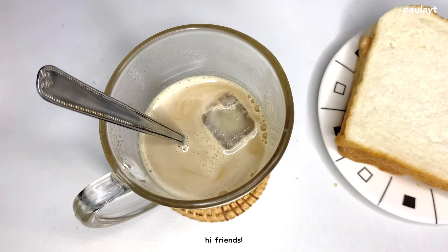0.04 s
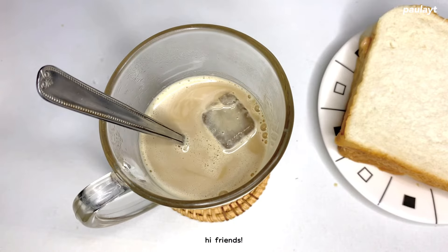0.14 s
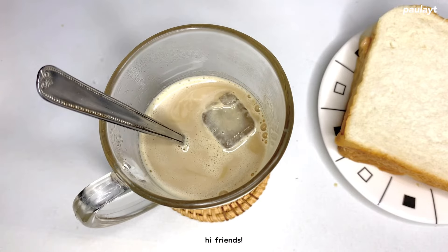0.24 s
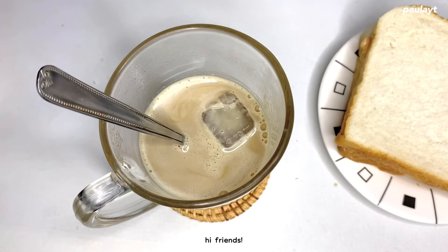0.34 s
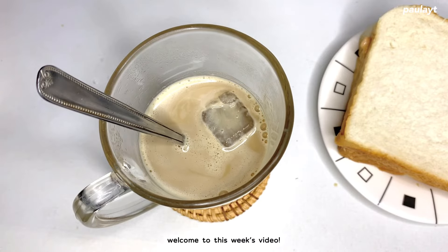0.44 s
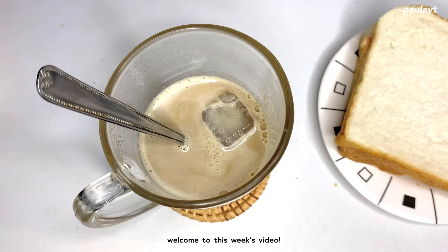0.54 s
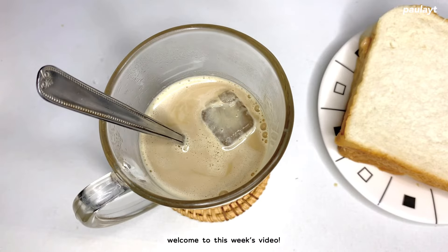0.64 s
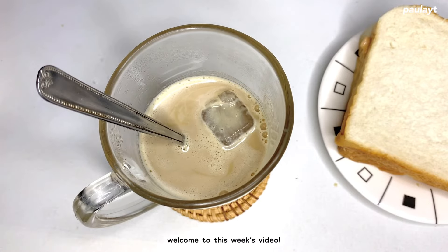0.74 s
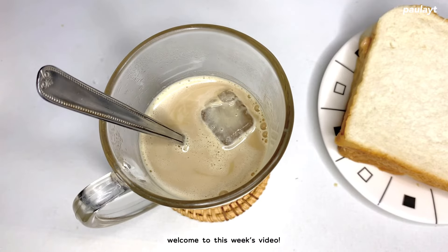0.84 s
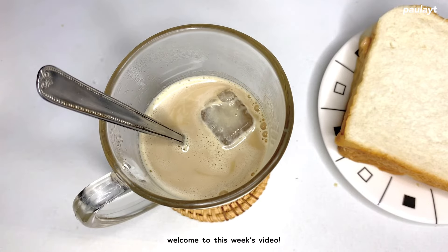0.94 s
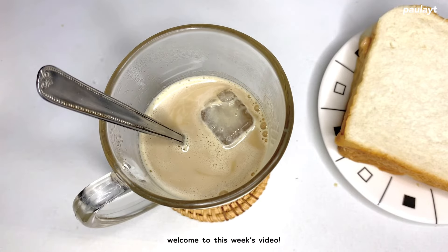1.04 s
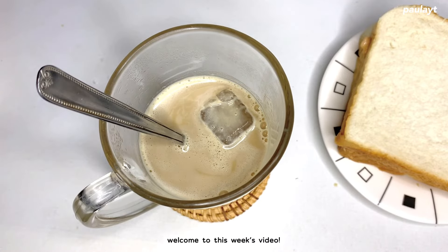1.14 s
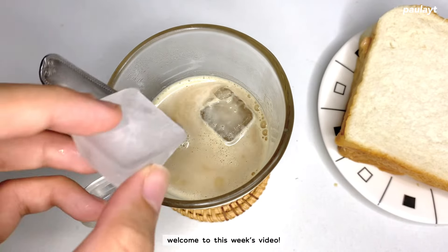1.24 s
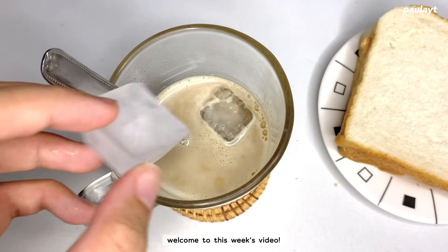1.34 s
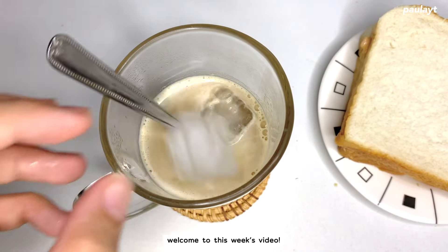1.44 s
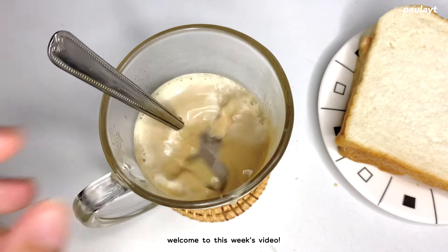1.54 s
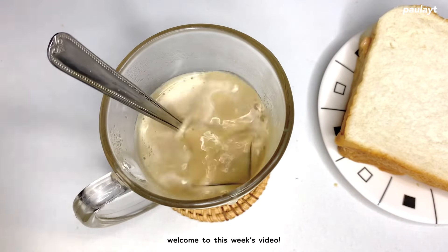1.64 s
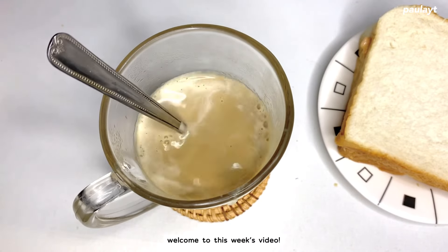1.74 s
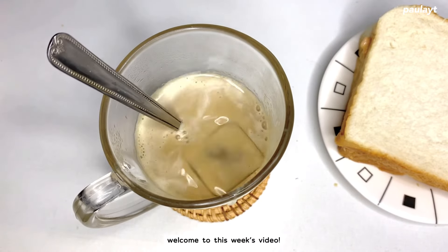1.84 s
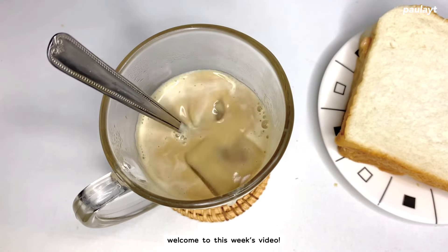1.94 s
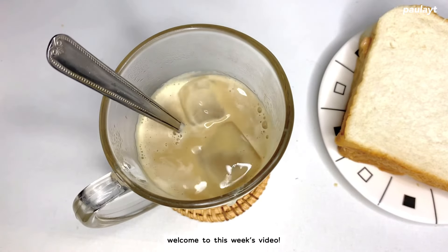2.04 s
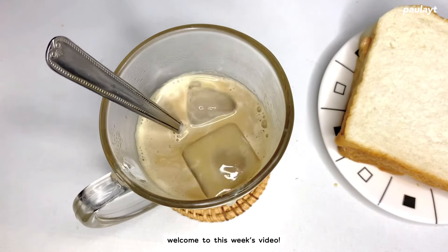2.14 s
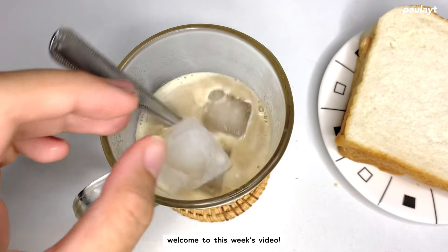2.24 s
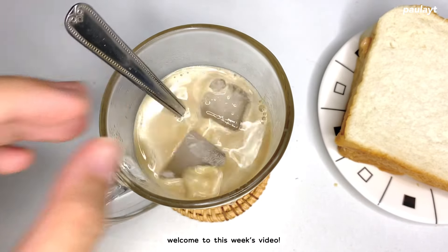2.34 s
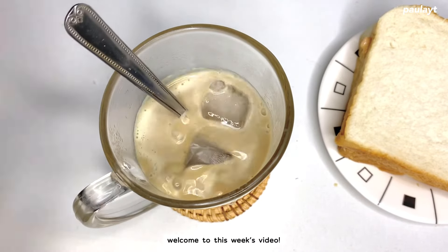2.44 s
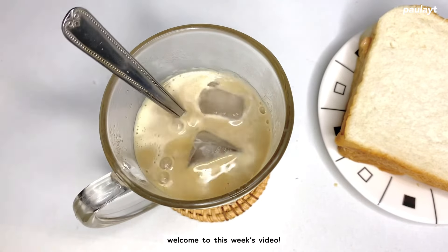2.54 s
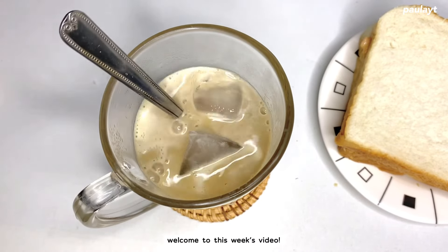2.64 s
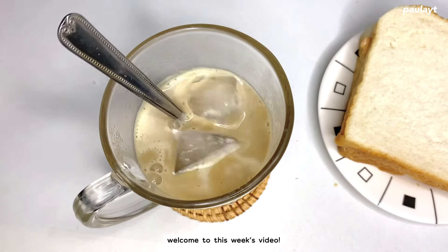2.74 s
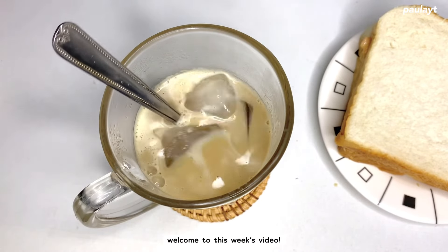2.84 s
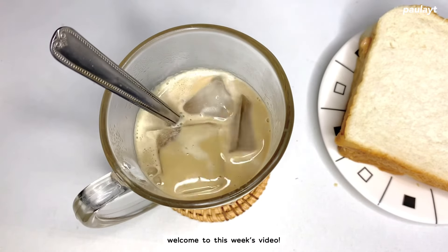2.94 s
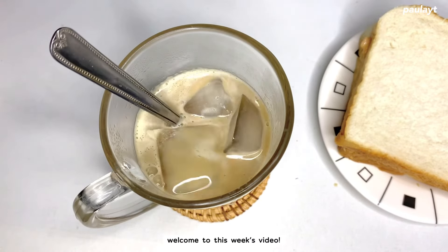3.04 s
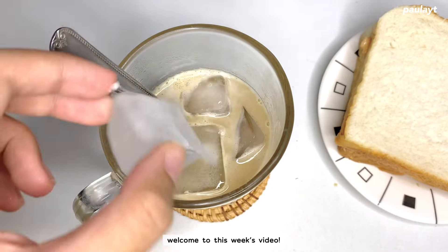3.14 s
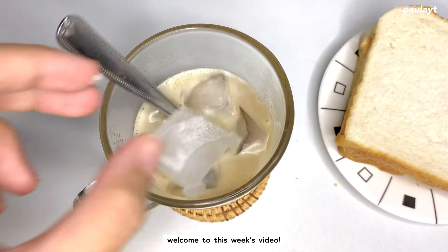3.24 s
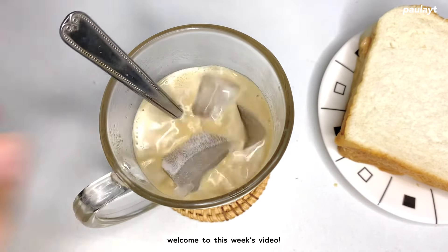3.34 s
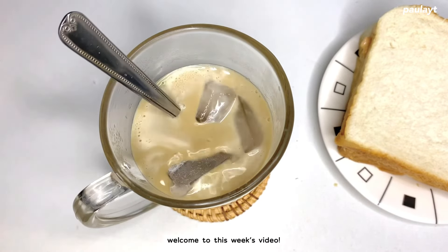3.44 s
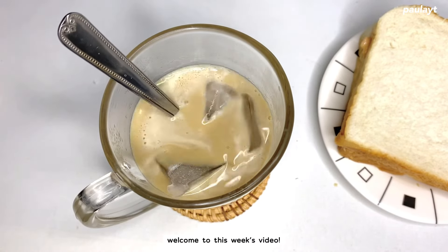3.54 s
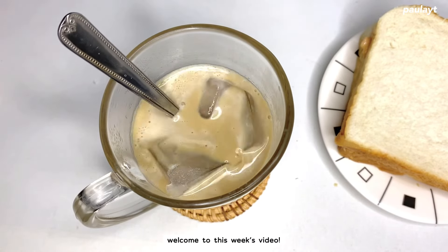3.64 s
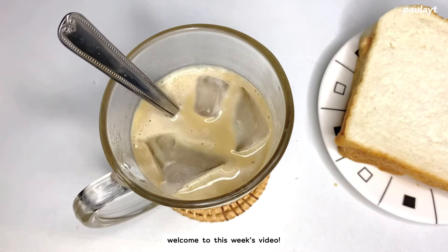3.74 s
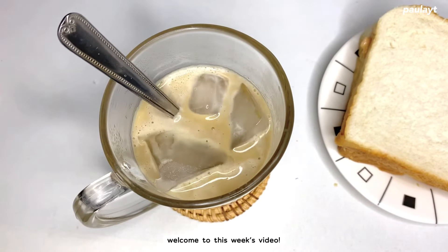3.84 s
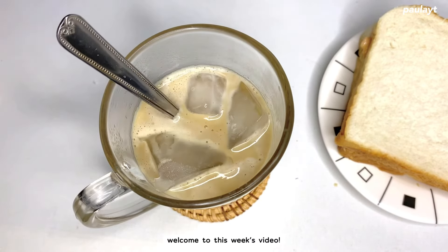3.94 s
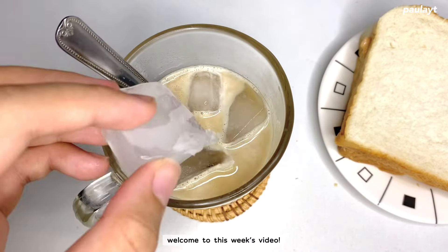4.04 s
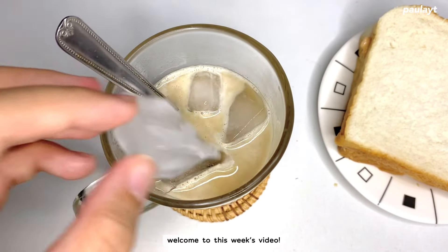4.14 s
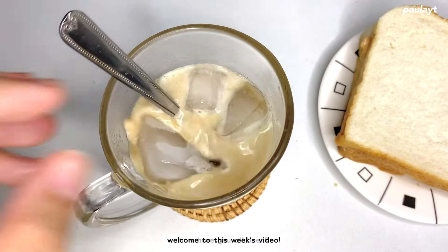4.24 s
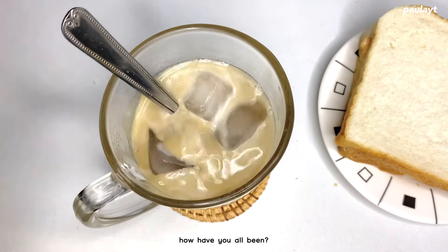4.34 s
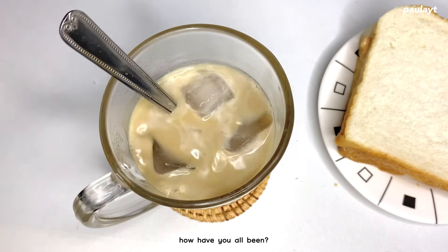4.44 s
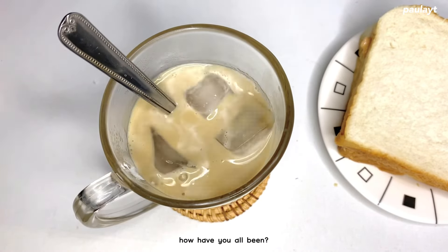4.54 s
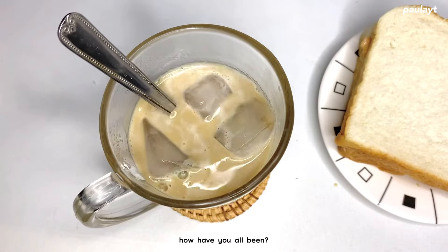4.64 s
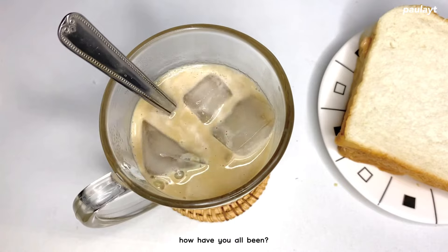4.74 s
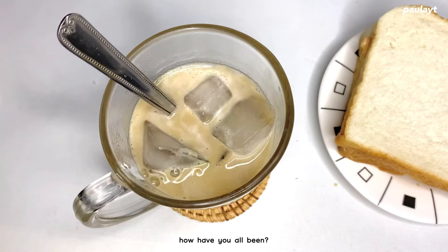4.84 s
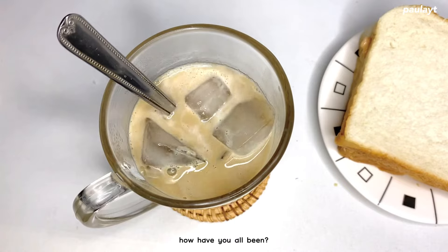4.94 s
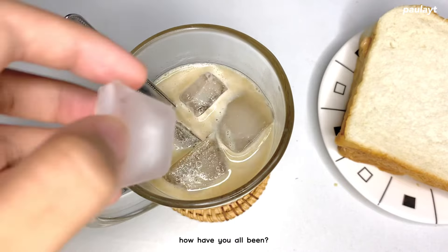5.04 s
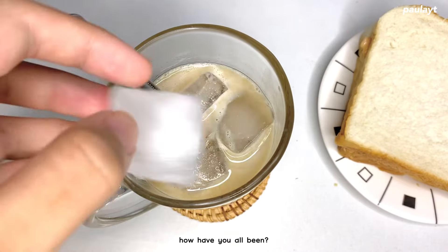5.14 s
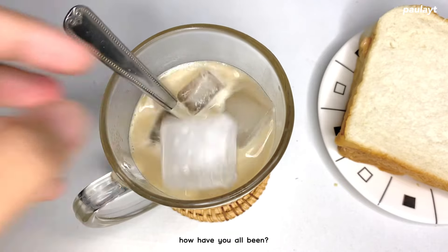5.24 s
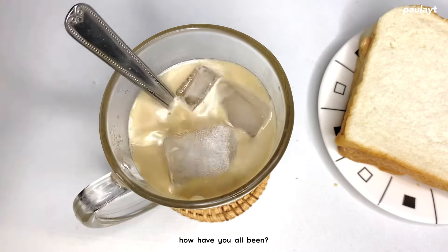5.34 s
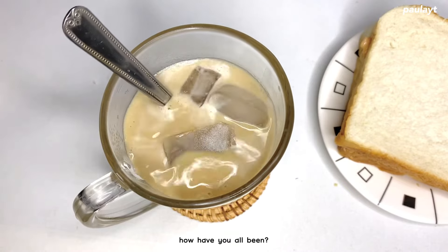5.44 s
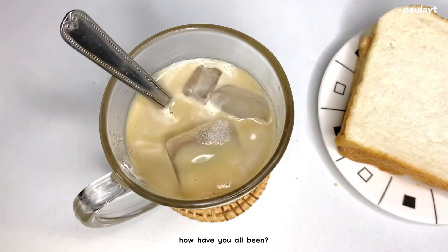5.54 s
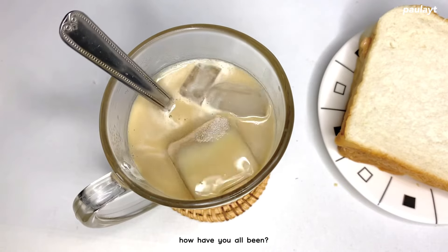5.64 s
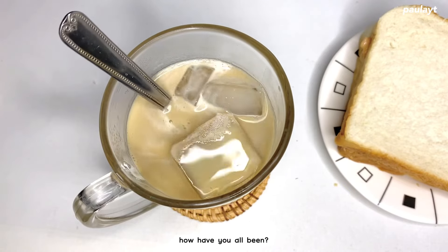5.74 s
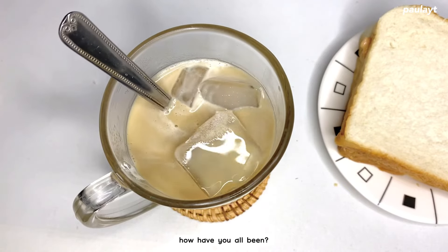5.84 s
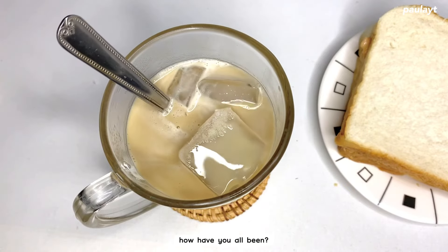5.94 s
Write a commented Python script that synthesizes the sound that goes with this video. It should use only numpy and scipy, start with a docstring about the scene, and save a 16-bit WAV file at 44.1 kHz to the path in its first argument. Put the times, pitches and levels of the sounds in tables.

```python
"""Ice cubes drop one by one into a glass mug of milky coffee on a kitchen table, close to a phone.
They strike glass, spoon and each other, clatter, then bob and tap; wall, spoon and ice ring in modes.
Each drop booms in the table top, with a grainy wash swelling around it; closing air pockets plop.
A hand rustles beforehand, and thin hisses glide near the end.
Street rumble and two passing engines, harmonics of their firing rates, come in through the window."""
import sys
import numpy as np
from scipy import signal
from scipy.fft import rfft, irfft, next_fast_len
from scipy.io import wavfile
from scipy.ndimage import map_coordinates

SR = 44100
rng = np.random.default_rng(int(sys.argv[2]) if len(sys.argv) > 2 else 0)


def store_pcm(level_fs):
    """Save levels as 16-bit WAV."""
    pcm = np.round(np.clip(level_fs, -1, 1) * 32767).astype(np.int16)
    wavfile.write(sys.argv[1], SR, np.atleast_2d(pcm).T)


N = 263718


def amp(db):
    return 10 ** (np.asarray(db) / 20)


def unit(x):
    return x / np.sqrt(np.mean(x ** 2) + 1e-20)


def along(points, hz):
    """Interpolate (Hz, value) points on a log axis."""
    f, v = np.transpose(points)
    return np.interp(np.log(hz + 1), np.log(f + 1), v)


def curves(rows):
    """Per-sample curves of the columns after time, and a gate open while the table lasts."""
    s, *cols = np.transpose(rows)
    t = np.arange(N) / SR
    gate = np.clip(np.minimum(t - s[0], s[-1] - t) / 0.0009, 0, 1)
    return [np.interp(t, s, c) for c in cols], gate


def wobble(rate_hz):
    """Smooth random curve."""
    knots = rng.standard_normal(int(N * rate_hz / SR) + 4)
    return map_coordinates(knots, [np.arange(N) * rate_hz / SR])


def swell(start, rise, t60, hold=0):
    """Gain in dB: rise, hold, steady fade."""
    t = np.arange(N) / SR - start
    return 20 * np.log10(np.clip(t / rise, 1e-6, 1)) - 60 * np.clip(t - rise - hold, 0, None) / t60


def filtered(x, response):
    """Apply a complex frequency response."""
    m = next_fast_len(x.shape[-1] + 8192)
    return irfft(rfft(x, m) * response(np.fft.rfftfreq(m, 1 / SR)), m)[..., :x.shape[-1]]


def ring(hz, t60, t, attack=0.0018):
    """Damped sine with a soft start."""
    return amp(-60 * t / t60) * np.sin(2 * np.pi * hz * t) * (1 - np.exp(-t / attack))


def resonant(x, modes, width_hz, pitch=1):
    """Resonator bank, rms 1 out; the width alone sets the decay."""
    def bank(f):
        damping = 1j * f * width_hz
        return sum(amp(db) * damping / ((hz * pitch) ** 2 - f * f + damping) for hz, db, _ in modes)
    return unit(filtered(x, bank))


def add(out, start_s, x):
    tail = out[..., round(start_s * SR):]
    tail[..., :x.shape[-1]] += x[..., :tail.shape[-1]]


# Two microphone ports. Each row: frequency in Hz, coherence.
PORT_COHERENCE = [(60, 1), (250, .8), (600, 0.18), (3000, 0.15), (7000, 0.15), (8300, 0.93), (16000, 0.32)]
def ports(a, b):
    """Mix two unrelated signals to a pair as alike as the ports hear it."""
    def weights(hz):
        angle = np.arccos(np.clip(along(PORT_COHERENCE, hz), 0, 1)) / 2
        return np.array([np.cos(angle), np.sin(angle)])
    mid, side = filtered(np.array([a, b]), weights)
    return np.array([mid + side, mid - side])


def noise(spectrum):
    """Coloured stereo noise, rms near 1."""
    a, b = filtered(rng.standard_normal((2, N)), lambda hz: amp(along(spectrum, hz)))
    return ports(unit(a), unit(b))


def grainy(spectrum, rate_hz, spread_db, t60):
    """Stereo noise roughened by random impacts of unequal size."""
    kicks = (rng.random(N) < rate_hz / SR) * amp(spread_db * rng.standard_normal(N))
    envelope = signal.lfilter([1], [1, -amp(-60 / (t60 * SR))], kicks) + 0.76
    return unit(envelope * noise(spectrum))


# Traffic spectra. Each row: frequency in Hz, density in dB.
RUMBLE_SPECTRUM = [(13, -46), (22, -33.5), (32, -7), (59, -4), (92, -4.5), (115, -0.5), (150, -24.5),
                   (250, -120)]
DRONE_SPECTRUM = [(110, -33.5), (126, 1.5), (137, 24), (146, -11.5), (165, -69)]
ROAR_SPECTRUM = [(88, -32.5), (150, -8.5), (177, -3.5), (242, -7), (286, -10), (306, -13), (395, -19.5),
                 (752, -35), (900, -47), (1170, -78), (1980, -120)]
# Their envelopes. Each row: time in seconds, level in dB.
RUMBLE_LEVELS = [(0.0, -54), (0.5, -53.5), (2.28, -43), (2.55, -51), (4.03, -56), (4.65, -52),
                 (5.08, -57.5), (5.58, -52.5), (5.98, -52)]
DRONE_LEVELS = [(0.0, -50), (0.06, -44.5), (0.56, -57.5), (0.7, -48.5), (1.13, -46), (1.3, -61.5),
                (1.51, -49), (2.05, -44), (2.1, -54), (2.86, -43.5), (3.21, -57), (3.28, -39.5),
                (3.41, -62.5), (4.23, -51), (4.91, -60), (5.03, -40.5), (5.43, -48), (5.98, -64.5)]
ROAR_LEVELS = [(0.0, -57), (0.4, -53.5), (1.45, -54), (2.25, -57), (2.41, -42.5), (2.73, -45), (2.9, -48),
               (3.03, -52), (3.35, -56.5), (5.03, -52.5), (5.21, -47), (5.98, -50.5)]
def street():
    """Traffic through the window: three wavering bands of low noise."""
    out = np.zeros((2, N))
    for levels, spectrum in ((RUMBLE_LEVELS, RUMBLE_SPECTRUM), (DRONE_LEVELS, DRONE_SPECTRUM),
                             (ROAR_LEVELS, ROAR_SPECTRUM)):
        (db,), _ = curves(levels)
        out += amp(db + 0.38 * wobble(5.3)) * noise(spectrum)
    return out


def microphone_hiss():
    """Steady self-noise."""
    return amp(-72) * noise([(500, 9), (6000, -3), (10000, -5), (15500, -9), (15800, -52)])


# Hand strokes. Each row: start in seconds, level in dB, rise and t60 in seconds.
STROKES = [(.302, -62, .003, 0.18), (.334, -59.5, 0.0021, 0.91), (.4, -52, 0.23, 0.23),
           (.594, -62, .003, .1), (.66, -56, 0.016, 0.43), (.785, -51.5, 0.026, 0.3),
           (.93, -69, 0.074, 0.46), (1.14, -60.5, 0.027, 0.37), (1.26, -65.5, 0.038, .3)]
# Each row: frequency in Hz, density in dB.
RUSTLE_SPECTRUM = [(300, -10.5), (1000, -5.5), (5000, -3), (9000, -8), (10000, -8.5), (15600, -10.5),
                   (16000, -57)]
def hand_rustle():
    """A hand rummages nearby: crinkly noise in strokes."""
    gain = sum(amp(db + swell(s, rise, t60)) for s, db, rise, t60 in STROKES)
    return gain * grainy(RUSTLE_SPECTRUM, rate_hz=900, spread_db=2.5, t60=.03)


# A higher drink loads the wall, lowering and damping its modes. Each row: time in seconds, pitch factor.
WALL_LOADING = [(1.4, .996), (2.25, .99), (3.3, .965), (4.4, .945), (5.5, .92)]
# Wall bending modes; spoon and rim modes. Each row: base frequency in Hz, level in dB, base t60 in seconds.
WALL_MODES = [(1785, 0, .32), (1972, -4, .3)]
SPOON_MODES = [(4130, -9, .28), (4497, 0, .3), (4592, 0, .28), (4662, -5, .28), (5520, -9, .22),
               (8940, -13, .18), (11450, -20, .1)]
# Each row: start in seconds, level in dB, left over right in dB, knock in Hz, knock trim in dB,
# wall trim in dB, ping in Hz, crack trim in dB, treble trim in dB.
CONTACTS = [(1.17, -43, -0.5, 1660, -19.5, -18.5, 4020, -5.5, -23),
            (1.19, -49, -1.5, 1250, -16, -5, 4920, -10.5, -23),
            (1.34, -30, 0.5, 1345, -14.5, -3, 4800, -23, -13),
            (1.377, -42.5, 12.5, 1270, -7, -15, 5310, -8.5, -11),
            (1.401, -22, 1.5, 1140, -30, -15.5, 5160, -10, -14),
            (1.472, -4.5, 4, 1404, -17, -15.5, 4400, -8, -14),
            (1.487, -18.5, 11, 1326, -13, -15.5, 4520, -16.5, -17),
            (1.644, -44.5, -11.5, 1610, -38, -6, 4540, -14.5, -32),
            (1.724, -55.5, 8.5, 1390, -7, -15, 2350, -13, -24),
            (1.826, -52.5, 7, 1384, -10, -13, 2530, -30, -32),
            (1.852, -63.5, 0, 1450, -9.5, -18.5, 2620, -23.5, -29),
            (1.907, -36.5, 9, 1430, -9.5, -7.5, 2460, -13, -30.5),
            (2.051, -44, 0.5, 1650, -19, -20, 5760, -6, -20),
            (2.058, -40, -5.5, 1480, -25, -10.5, 5170, -3.5, -20),
            (2.106, -56, 6, 1370, -3.5, -9.5, 4670, -8, -37),
            (2.129, -46.5, 2, 1340, -15, -10.5, 3270, -11, -33),
            (2.204, -35.5, -6.5, 1610, -14.5, -16.5, 6540, -10.5, -32),
            (2.219, -21, 4, 1270, -24, -16, 7260, -15.5, -14),
            (2.231, -16, 8.5, 1520, -24, -14.5, 3370, -5, -9),
            (2.246, -18, 4, 1400, -24, -23, 6800, -7.5, -21),
            (2.278, -20, 2, 1390, -23, -15, 4670, -28, -15),
            (2.316, -33, 2, 1560, -16, -14.5, 4530, 3.5, -18),
            (2.423, -41, 4, 1600, -13, -17, 4410, -21, -36),
            (2.463, -49, 0, 1480, -9.5, -7, 4470, -13.5, -42),
            (2.507, -42.5, 0.5, 1605, -9, -10, 2670, -27.5, -29),
            (2.565, -42, -4, 1390, -15.5, -9.5, 3030, -15.5, -33),
            (2.628, -48.5, 1.5, 1620, -8.5, -6.5, 2490, -27.5, -29),
            (2.699, -35, 1, 1440, -15, -6, 7160, -21.5, -22),
            (2.731, -34.5, -1.5, 1400, -16, -7.5, 3200, -16.5, -30),
            (2.763, -33, 4, 1360, -18, -12, 3700, -16, -31),
            (2.805, -37.5, -6.5, 1500, -21, -11.5, 3080, -11, -23),
            (2.885, -32, -1, 1635, -10.5, -15.5, 2570, -11, -44),
            (2.981, -41, -0.5, 1500, -11.5, -10, 5820, -7, -38),
            (3.214, -28, -0.5, 1368, -12.5, -10, 4360, -11, -15),
            (3.225, -24, -8.5, 1640, -16.5, -17, 4520, -5, -12),
            (3.236, 2, 0.5, 1465, -31.5, -29.5, 3326, -5.5, -14),
            (3.249, -28, 3.5, 1430, -26, -20, 3000, -8.5, -24),
            (3.275, -27, -3.5, 1570, -19.5, -21, 3340, -11.5, -24),
            (3.298, -22, 1.5, 1267, -11.5, -6, 5130, -16.5, 4),
            (3.335, -22.5, 6, 1300, -20.5, -13, 4260, -13, -19),
            (3.402, -38.5, 4, 1640, -13, -21, 4430, -15, -45),
            (3.445, -46, -0.5, 1520, -14, -14, 4390, -10.5, -20),
            (3.459, -34.5, 0, 1330, -25, -29, 3750, -7.5, -1),
            (3.482, -36, 3, 1307, -17, -10.5, 4320, -17, -22),
            (3.558, -34, 3.5, 1347, -13.5, -7.5, 2520, -34.5, -36),
            (3.582, -25, 1, 1436, -10.5, -21, 2480, -48.5, -9),
            (3.596, -34, 2.0, 1314, -10.5, -29, 2580, -37, -4),
            (3.749, -43, 1.5, 1586, -5, -7.5, 2750, -23.5, -40),
            (3.76, -46, 2, 1475, -3, -8.5, 2960, -25.5, -24.5),
            (3.768, -39, -1, 1637, -7, -12.5, 5040, -22.5, -16),
            (3.82, -49, 3, 1600, -5.5, -2, 3210, -19, -30),
            (3.847, -53.5, -1, 1400, -8, -23.5, 2926, -20, -32),
            (4.215, -8.5, 3, 1648, -14, -13.5, 3350, -8.5, -1),
            (4.226, -10.5, -1.5, 1626, -18, -23, 3680, -8.5, -13),
            (4.274, -20, 1, 1380, -21, -26, 4800, -19, -4),
            (4.321, -32, 4.5, 1645, -7.5, -18, 4670, -12, -18),
            (4.399, -30, 4.5, 1360, -20, -34, 7060, -15, -8),
            (4.423, -33.5, -6, 1570, -23, -25, 5010, -12, -5),
            (4.457, -44, 1, 1320, -14.5, -7, 4260, -14, -28),
            (4.511, -36, -3.5, 1630, -11, -3.5, 3050, -17, -40),
            (4.535, -34, 0.5, 1466, -16.5, -9.5, 3280, -8.5, -42),
            (4.606, -47, -2, 1374, -14, -8, 5010, -10, -23),
            (4.683, -39.5, 2, 1560, -10.5, -15.5, 6990, -11, -13),
            (4.869, -61.5, -3.5, 1124, -22, -34, 6440, 0, -19.5),
            (4.92, -58, 3.5, 1640, -7.5, -12, 3080, -21, -20.5),
            (5.201, -10.5, 6.5, 1556, -18.5, -26, 3010, -7, -3),
            (5.211, -25, -4, 1590, -11.5, -13.5, 4500, -11, -17),
            (5.257, -21.5, 1, 1675, -32, -21.5, 3390, -2, -18),
            (5.282, -21, -0.5, 1530, -23, -20.5, 3530, -9.5, -5.5),
            (5.298, -17.5, 6.5, 1564, -11, -18, 4790, -12, -17),
            (5.365, -35, 1.5, 1627, -3, -10.5, 3920, -8.5, -13),
            (5.398, -39, 3.5, 1630, -10, -18, 3390, -20, -30),
            (5.424, -39.5, 3, 1570, -12, -13, 2680, -17, -34),
            (5.49, -41.5, 0, 1560, -10, -9, 3730, -7, -25),
            (5.523, -37, 6.5, 1623, -8, -19, 5240, -14.5, -16),
            (5.559, -46.5, 2, 1540, -6, -12, 2580, -29.5, -37.5),
            (5.638, -37.5, 1.5, 1600, -13.5, -8.5, 2529, -21.5, -31),
            (5.656, -35.5, 9.5, 1585, -12, -10.5, 2590, -12, -23),
            (5.691, -32, 1.5, 1596, -20, -8, 2680, -34, -51),
            (5.721, -44.5, 0, 1570, -8.5, -3, 4870, -18, -33),
            (5.818, -40, -0.5, 1576, -7.5, -10, 5440, -28, -37)]
WET_T60_SHARE = 0.41
SPOON_DB, SPOON_SINK_DB_PER_S = -16, 5.5  # duller as cubes crowd it
def ice_contacts():
    """Each contact knocks, clicks, pings the cube, cracks, and rings wall and spoon."""
    out, t = np.zeros((2, N)), np.arange(SR // 2) / SR
    short = t[:4096]
    burst = (1 - np.exp(-short / 0.0008)) * amp(-60 * short / 0.008)
    crack_band = signal.butter(3, [3000, 8000], "band", fs=SR, output="sos")
    treble_band = signal.butter(3, [9000, 15900], "band", fs=SR, output="sos")
    for s, db, pan_db, knock_hz, knock_db, wall_db, ping_hz, crack_db, treble_db in CONTACTS:
        scatter = rng.standard_normal(16)
        crack_noise, treble_noise = burst * rng.standard_normal((2, len(short)))
        load = np.interp(s, *np.transpose(WALL_LOADING))
        wall = sum(amp(level + 2 * z) * ring(hz * load, t60 * WET_T60_SHARE * load ** 6, t, 0.00076)
                   for (hz, level, t60), z in zip(WALL_MODES, scatter))
        spoon = sum(amp(level + 4 * z) * ring(hz, t60 * load ** 8, t)
                    for (hz, level, t60), z in zip(SPOON_MODES, scatter[len(WALL_MODES):]))
        knock = amp(knock_db + 11) * ring(knock_hz, 0.024, short, 0.00099)
        thud = amp(knock_db) * ring(1026, 0.0091, short, 0.00088)
        click = amp(knock_db + 7.5) * ring(2550 * amp(scatter[-1]), .005, short, .0002)
        ping = amp(crack_db + 6) * ring(ping_hz, 0.011, short, 0.0005)
        crack = amp(crack_db + 10) * signal.sosfilt(crack_band, crack_noise)
        treble = amp(treble_db + 8) * signal.sosfilt(treble_band, treble_noise)
        spoon_db = crack_db + SPOON_DB - SPOON_SINK_DB_PER_S * s
        contact = amp(wall_db - 2.5) * wall + amp(spoon_db) * spoon
        contact[:len(short)] += knock + thud + click + ping + crack + treble
        add(out, s, amp(db) * amp([[pan_db / 2], [-pan_db / 2]]) * contact)
    return out


# Each row: start in seconds, level in dB.
HANDLE_NUDGES = [(1.19, -62.5), (1.29, -72), (1.4, -52), (1.472, -45.5), (1.66, -67)]
def spoon_handle():
    """The free handle sings one thin tone when nudged."""
    out, t = np.zeros(N), np.arange(SR) / SR
    for s, db in HANDLE_NUDGES:
        add(out, s, amp(db) * ring(hz=4940, t60=.45, t=t))
    return out


# Each row: start in seconds, level in dB.
WASH_SWELLS = [(1.3, -64), (2.25, -57.5), (3.25, -73), (4.25, -70.5), (5.15, -55.5)]
# Each row: frequency in Hz, density in dB.
WASH_SPECTRUM = [(500, -18.5), (700, -3), (1200, -6.5), (2000, 0.5), (4000, -12), (7500, -31),
                 (9000, -72.5)]
def wash():
    """A broad, grainy midrange wash swells and fades slowly around each drop."""
    gain = amp(-85) + sum(amp(db + swell(s, rise=.18, t60=1.9)) for s, db in WASH_SWELLS)
    return gain * grainy(WASH_SPECTRUM, rate_hz=210, spread_db=2.5, t60=0.035)


# Each row: frequency in Hz, density in dB.
GRAIN_SPECTRUM = [(600, -31), (900, -18), (1400, -22), (1750, -8), (2500, 3.5), (3300, -13), (4500, -5.5),
                  (6000, -14.5), (8900, -9), (11500, -8), (13500, -17.5), (15600, -19), (16000, -53)]
# Packed cubes. Each row: frequency in Hz, level in dB, t60 in seconds (unused).
ICE_MODES = [(3180, -3, .1), (3280, 0, .1), (3390, 0, .1), (3610, -5, .1), (3770, -4, .1), (3880, -7, .1),
             (5070, -7, .1), (6900, -9, .1)]
# Each row: start in seconds, level in dB, hold and t60 in seconds, then treble, hollow, wall and
# spoon chime trims in dB.
JOSTLES = [(1.33, -59, 0.27, 0.47, -3, -6.5, 6.5, -2.5), (1.395, -46, 0.0028, 0.046, 5, -23.5, -12, -1),
           (1.466, -35, 0.058, 0.2, -1.5, -15, 1.5, -2.5), (2.047, -57, 0.014, 0.09, -4.5, -7, 5.5, -13.5),
           (2.216, -33.5, 0.038, 0.11, -2, -10, -1.5, -13),
           (2.265, -34.5, 0.022, 0.2, 1.5, -4.5, 0.5, -5.5), (2.802, -51, 0.0023, 0.14, -10, -8, 6, -15),
           (3.211, -34, 0.019, 0.07, 1.5, -7.5, 3, -7.5), (3.237, -33, 0.046, 0.2, -8, -18, -1.5, -13),
           (3.456, -55, 0.0044, 0.27, -7, -2, -7, -2), (4.215, -35, 0.0034, 0.26, -18, -11, -7, -20.5),
           (4.315, -45, 0.0014, 0.041, -1.5, 4, -5, -4), (4.392, -52.5, 0.014, 0.21, -6, -3.5, -1, -7),
           (5.204, -35.5, 0.0029, 0.17, -11.5, -9, 3, -30), (5.248, -51.5, 0.05, 0.12, -6, -14, 3.5, -11),
           (5.365, -48.5, 0.0026, 0.099, -6, -28, 0, -22)]
TREBLE_EXTRA_FADE, CHIME_FADE_RELIEF = .7, 0.17  # shares of the fade
ICE_DB, ICE_GROWTH_DB_PER_S = -19, 4  # more cubes, more ring
def clatter():
    """Cubes jostle and splash after a blow: dense grains keep spoon, ice and wall ringing."""
    out, t = np.zeros((2, N)), np.arange(N) / SR
    grains = grainy(GRAIN_SPECTRUM, rate_hz=400, spread_db=3.5, t60=0.018)
    bright = filtered(grains, lambda hz: 1 / (1 + (8500 / (hz + 1)) ** 12))
    hollow = unit(filtered(grains, lambda hz: 1 / (1 + (hz / 1700) ** 12)))
    middle = unit(filtered(grains - bright, lambda hz: 1 / (1 + (2900 / (hz + 1)) ** 12)))
    chime = resonant(grains, SPOON_MODES, width_hz=12)
    ice = resonant(grains, ICE_MODES, width_hz=45)
    for s, db, hold, t60, treble_db, hollow_db, wall_db, chime_db in JOSTLES:
        load = np.interp(s, *np.transpose(WALL_LOADING))
        wall = resonant(grains[0], WALL_MODES, width_hz=14, pitch=load)
        fade_db = swell(s, rise=.004, t60=t60, hold=hold)
        relief_db = -CHIME_FADE_RELIEF * fade_db.clip(-40, 0) * (t > s + hold)
        ice_db = ICE_DB + ICE_GROWTH_DB_PER_S * min(s, 3.3)
        treble = amp(treble_db + TREBLE_EXTRA_FADE * fade_db) * unit(bright)
        ringing = amp(chime_db + relief_db) * chime + amp(ice_db) * ice + amp(wall_db) * wall
        out += amp(db + fade_db) * (amp(hollow_db) * hollow + middle + treble + ringing)
    return out


# Each row: start in seconds, level in dB.
TABLE_JOLTS = [(1.476, -31), (2.221, -28), (3.232, -31.5), (4.224, -27.5), (5.203, -25.5)]
# Each row: frequency in Hz, level in dB, t60 in seconds.
TABLE_MODES = [(106, 0, 0.18), (226.1, -4, 0.18), (394, -9.5, 0.07)]
def table_thumps():
    """The mug jolts the table top, which booms under each falling cube."""
    out, t = np.zeros(N), np.arange(SR // 2) / SR
    boom = sum(amp(db) * ring(hz, t60, t, attack=0.0037) for hz, db, t60 in TABLE_MODES)
    for s, db in TABLE_JOLTS:
        add(out, s, amp(db) * boom)
    return out


# Truck, two motorbike runs, throttle blip.
# Each row: time in seconds, firing rate in Hz, low and high group levels in dB.
TRUCK_RUN = [(2.15, 22.8, -60, -68), (2.3, 24.22, -43.5, -54.5), (2.462, 25.07, -44.5, -69),
             (2.53, 25.93, -58.5, -46.5), (2.67, 26.54, -57, -58.5), (2.85, 27.65, -45.5, -55.5),
             (3.05, 28.85, -57, -74)]
BIKE_RUNS = [
    [(4.0, 34.9, -55, -60.5), (4.24, 36.2, -58.5, -55), (4.57, 36.8, -55, -57.5), (4.8, 37.47, -47.5, -53),
     (4.95, 37.6, -68.5, -55.5)],
    [(5.2, 34.8, -53.5, -58), (5.32, 35.53, -45, -60), (5.42, 35.93, -42, -51), (5.58, 36.44, -36.5, -44),
     (5.67, 36.16, -40, -51), (5.8, 36.85, -39.5, -44.5), (5.86, 36.6, -42.5, -48.5),
     (5.98, 37.65, -38.5, -45)],
]
BLIP_RUN = [(4.985, 33.56, -49, -43.5), (5.02, 33.64, -37.5, -36.5), (5.15, 33.95, -48.5, -39),
            (5.24, 35, -46, -54)]
# Low group, then high group. Each row: order, level in dB.
TRUCK_HARMONICS = [(4, -7.5), (5, 2.5), (6, -6.5)], [(7, -19.5), (8, -17.5), (9, -11), (10, 1.5)]
BIKE_HARMONICS = [(2, 0)], [(4, -12), (5, -3), (6, 0), (7, -9), (10, -15)]
BLIP_HARMONICS = [(2, -12), (4, 0)], [(5, -18), (6, 0), (7, -11), (10, -22), (12, -22)]
# Each row: frequency in Hz, density in dB.
EXHAUST_SPECTRUM = [(300, -29), (450, 0.5), (900, -2.5), (1300, -12.5), (2000, -49.5)]
EXHAUST_DB, UNSTEADY_DB = -25.5, 1.5
def engines():
    """Unsteady orders of the firing rate; exhaust rasp follows the high group."""
    out = np.zeros((2, N))
    runs = [(TRUCK_RUN, TRUCK_HARMONICS), (BLIP_RUN, BLIP_HARMONICS)]
    runs += [(run, BIKE_HARMONICS) for run in BIKE_RUNS]
    for run, groups in runs:
        (firing_hz, low_db, high_db), gate = curves(run)
        phase = 2 * np.pi * np.cumsum(firing_hz) / SR
        tones = np.zeros(N)
        for group_db, group in zip((low_db, high_db), groups):
            for order, db in group:
                gain = np.sqrt(2) * amp(group_db + db + UNSTEADY_DB * wobble(8))
                tones += gain * np.sin(order * phase + 0.33 * wobble(17))
        rasp = amp(high_db + EXHAUST_DB) * noise(EXHAUST_SPECTRUM)
        out += gate * (tones + rasp)
    return out


# Each row: start in seconds, level in dB, initial pitch in Hz.
AIR_POCKETS = [(2.279, -25.5, 879), (2.32, -33.5, 916), (2.35, -46, 925), (3.297, -23.5, 1280),
               (4.275, -38, 900), (4.397, -44.5, 880)]
PLOP_RISE_PER_S = 3.2
def plops():
    """Air pockets close and ring with rising pitch."""
    out, t = np.zeros(N), np.arange(SR // 4) / SR
    for s, db, hz in AIR_POCKETS:
        add(out, s, amp(db) * ring(hz * (1 + PLOP_RISE_PER_S * t / 2), t60=0.043, t=t))
    return out


# Each row: start in seconds, level in dB.
SPOON_NICKS = [(3.582, -45), (3.598, -44)]
def spoon_tinks():
    """A cube nicks the spoon: a high, flickering ring."""
    out, t = np.zeros(N), np.arange(SR // 4) / SR
    for s, db in SPOON_NICKS:
        flicker_db = 12 * wobble(600)[:len(t)]
        add(out, s, amp(db + flicker_db) * ring(hz=12000, t60=.045, t=t, attack=.0003))
    return out


# Each row: start in seconds, level in dB, rise and t60 in seconds, initial centre in Hz, glide in Hz/s.
HISS_GLIDES = [(4.59, -67, 0.1, 0.23, 4700, 2998.5), (4.66, -58.5, 0.044, 0.4, 6960, 4000.5),
               (4.862, -74, 0.02, .17, 6700, -8000), (5.73, -60, 0.027, 0.29, 6690, -3000),
               (5.83, -69.5, 0.031, 0.8, 5532, 2000.5)]
def thin_hisses():
    """Narrow noise around a gliding centre."""
    out, t = np.zeros(N), np.arange(N) / SR
    for s, db, rise, t60, hz, hz_per_s in HISS_GLIDES:
        band = filtered(rng.standard_normal(N), lambda f: 1 / (1 + (f / 550) ** 2))
        carrier = np.sin(2 * np.pi * (hz + hz_per_s * (t - s) / 2) * (t - s))
        out += amp(db + swell(s, rise, t60) + 1.7 * wobble(60)) * unit(band * carrier)
    return out


# Each row: frequency in Hz, t60 in seconds.
KITCHEN_DECAY = [(300, 0.12), (2000, 0.23), (8000, 0.11), (15000, 0.065)]
def kitchen(x):
    """Room reverb; a fresh tail every quarter second stands for the moving source."""
    out, step, predelay_samples = np.zeros((2, N)), SR // 4, 120
    for start in range(0, N, step):
        hz, t, bins = signal.stft(rng.standard_normal((2, SR // 2)), SR, nperseg=256)
        decay = amp(-60 * t / along(KITCHEN_DECAY, hz)[:, None])
        tail = ports(*signal.istft(bins * decay, SR, nperseg=256)[1])
        wet = signal.fftconvolve(x[None, start:start + step], tail / np.linalg.norm(tail[0]), axes=1)
        add(out, (start + predelay_samples) / SR, wet)
    return out


# Each row: frequency in Hz, left-right phase difference in radians.
AROUND_PHASE = [(0, 0), (2000, 3.1), (4000, 6.3), (6400, 6.6), (8700, 9.42), (11000, 12.57), (13350, 15.7),
                (15800, 18.85), (17500, 19)]
MUG_PHASE = [(0, 0), (1550, -.9), (2700, -3.14), (3800, -4.6), (4900, -6.28), (6600, -6), (8700, -3.14),
             (11000, 0), (13350, 3.14), (15800, 6.28), (17500, 6.4)]
def widen(pair, phase):
    """A left-right phase difference by frequency gives stereo width."""
    halves = np.array([[-.5j], [.5j]])
    return filtered(pair, lambda hz: np.exp(halves * np.interp(hz, *np.transpose(phase))))


def scene():
    """The mug in its room, the table and the surroundings."""
    mug = ice_contacts() + clatter() + spoon_handle() + plops() + spoon_tinks()
    near = mug + amp(-7) * kitchen(mug.mean(0)) + thin_hisses()
    around = hand_rustle() + street() + wash() + microphone_hiss() + engines()
    return widen(near, MUG_PHASE) + table_thumps() + widen(around, AROUND_PHASE)


# Each row: frequency in Hz, left over right in dB.
PORT_BALANCE = [(50, 9), (130, -0.5), (500, 2.5), (1200, 3.5), (2000, 0), (4500, -1.5), (8000, -0.5)]
LOW_CUT_HZ, TOP_HZ, CEILING = 38, 17000, .92
def record(dry):
    """Port colour, bass roll-off, soft clipping, band limit."""
    def colour(hz):
        balance = amp(along(PORT_BALANCE, hz) * np.array([[.5], [-.5]]))
        return balance / (1 + (LOW_CUT_HZ / (hz + 1)) ** 12)
    coloured = filtered(dry, colour)
    rounded = coloured / (1 + np.abs(coloured / CEILING) ** 6) ** (1 / 6)
    return filtered(rounded, lambda hz: np.clip((TOP_HZ - hz) / 1100, 0, 1) ** 2)


dry = scene()
out = record(dry)
store_pcm(out)
```